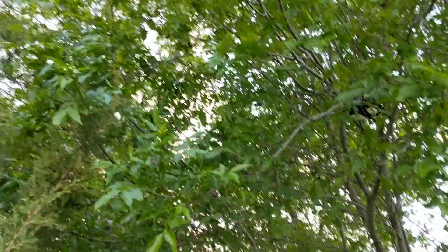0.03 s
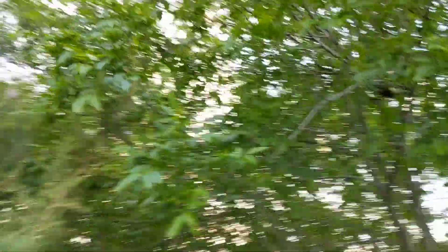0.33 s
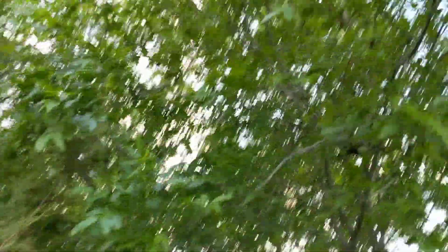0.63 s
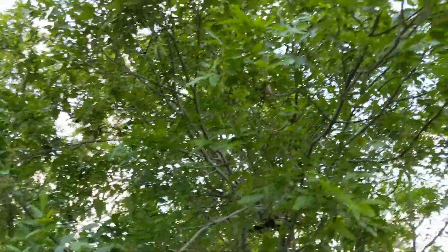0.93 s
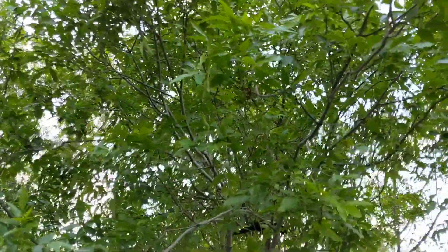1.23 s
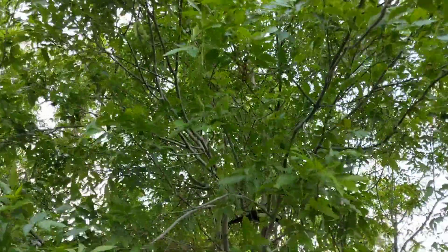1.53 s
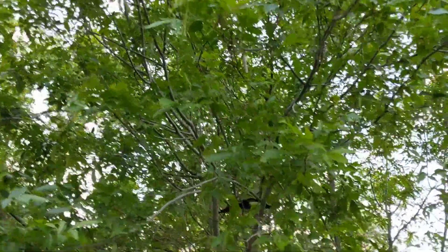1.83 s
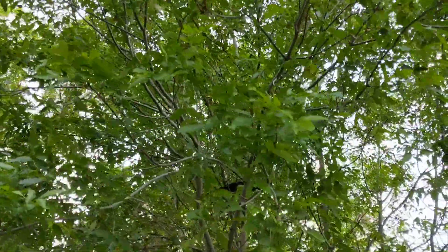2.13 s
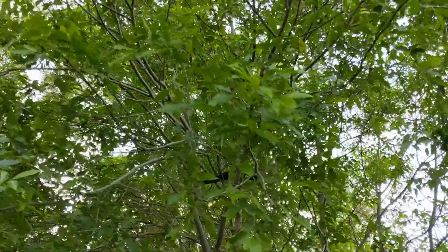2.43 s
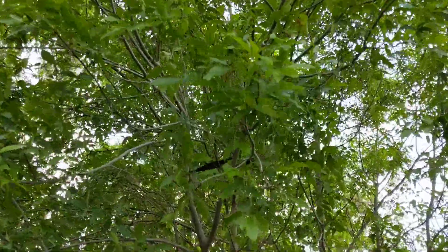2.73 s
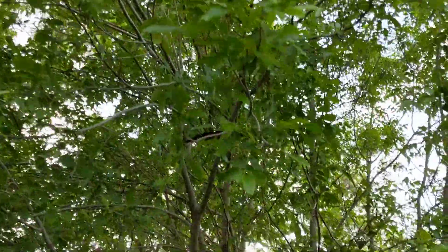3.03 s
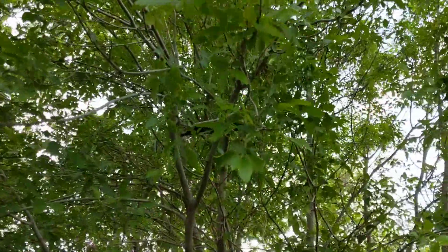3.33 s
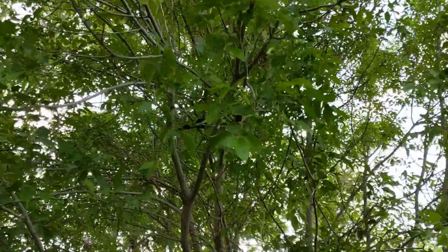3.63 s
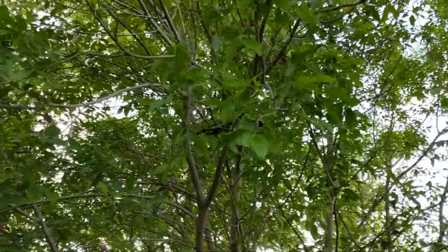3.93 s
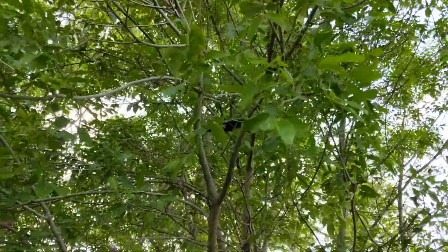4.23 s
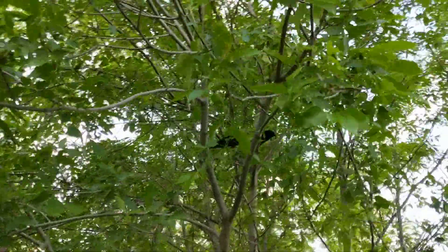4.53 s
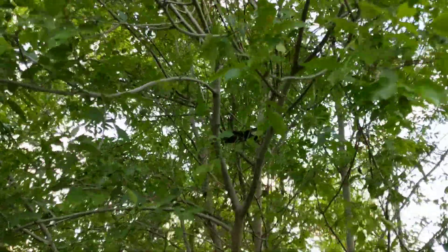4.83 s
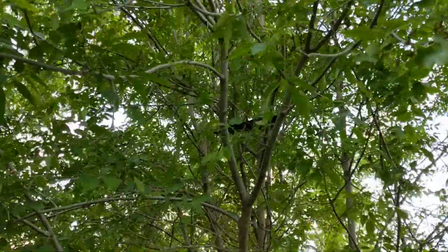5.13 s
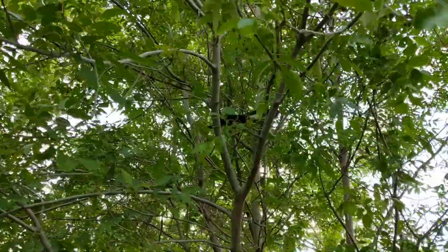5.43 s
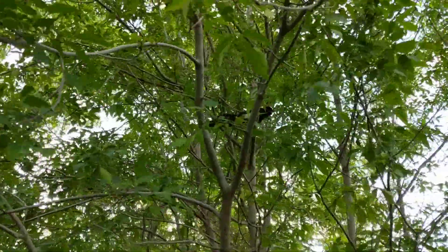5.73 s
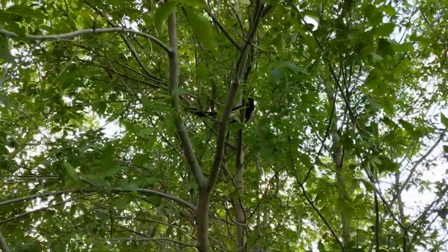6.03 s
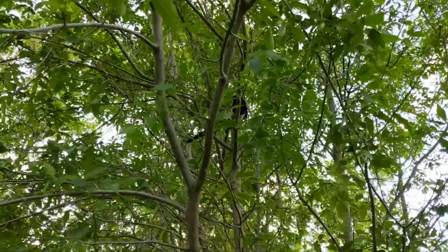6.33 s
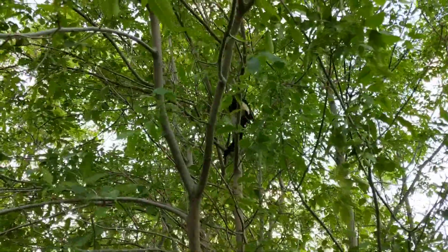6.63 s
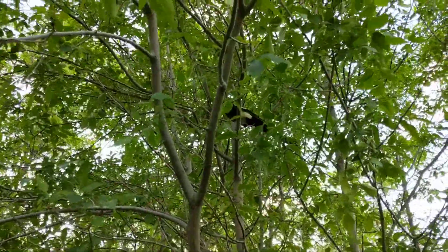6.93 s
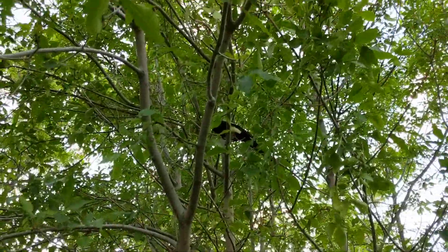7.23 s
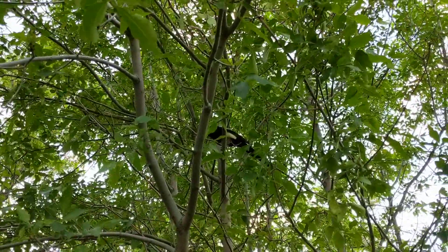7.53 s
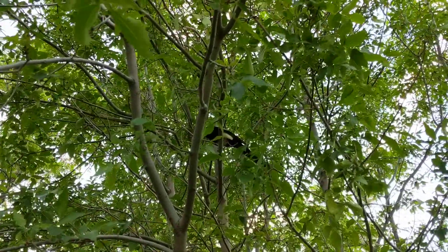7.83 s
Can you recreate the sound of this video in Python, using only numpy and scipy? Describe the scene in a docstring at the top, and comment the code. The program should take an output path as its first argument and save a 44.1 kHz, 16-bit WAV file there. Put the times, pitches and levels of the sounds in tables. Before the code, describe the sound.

Rapid, raspy magpie chatter outdoors pauses for twig snaps, leaf rustle and a distant small bird, then starts again.

```python
"""A magpie in a leafy tree rattles two runs of harsh syllables, five a second. Its membranes slap
unevenly while slack, then tighten and lock into a tone: each rasp becomes a rising squawk.
In the pause a small bird whistles chirps further off, leaves rustle and twigs snap and ring.
Branches and trees scatter the calls and snaps. Gusts and soft bumps sound at the hand-held
microphone, over a distant outdoor wash."""
import sys
import numpy as np
from scipy import signal
from scipy.fft import rfft, irfft, next_fast_len
from scipy.io import wavfile
from scipy.ndimage import uniform_filter1d

SR = 44100
rng = np.random.default_rng(int(sys.argv[2]) if len(sys.argv) > 2 else 0)


def bounce(signal):
    """Save signal as a 16-bit WAV file at the path given by the first command-line argument."""
    frames = np.transpose(np.atleast_2d(signal))
    limited = np.clip(frames, -1, 1)
    pcm = np.round(limited * 32767).astype(np.int16)
    wavfile.write(sys.argv[1], SR, pcm)


N = 356769
TIME_S = np.arange(N) / SR
BAND_LIMIT_HZ = 15900

# distant wash spectrum: freq_hz, gain_db
WASH_SPECTRUM = [(15, -39), (25, -36), (55, -6.5), (166, -14.5), (212, -11.5), (335, -18), (405, -20),
                 (677, -19), (988, -17.5), (2160, -28), (2610, -32), (5140, -40.5), (8360, -38),
                 (10700, -43.5), (16000, -47)]
# wind buffet spectrum: freq_hz, gain_db
GUST_SPECTRUM = [(22, -31.5), (45, 1), (75, 4), (115, -1.5), (170, -14), (300, -27.5), (700, -30.5),
                 (2000, -60.5)]
# gusts on the microphone: peak_s, level_db, rise_s, fall_s
GUSTS = [(2.6, -52.5, 0.17, .25), (3.06, -47.5, 0.067, 0.28), (3.4, -52.5, 0.094, 0.14),
         (3.64, -48.5, 0.097, 0.082), (3.94, -48.5, 0.024, 0.19), (4.45, -47.5, .03, 0.82),
         (5.02, -41.5, 0.25, 0.31)]
# soft bumps near the microphone, and the dull body of the twig knock at 4.85 s: centre_s, length_s, centre_hz,
# width_hz, level_db
BUMPS = [(.76, 0.12, 161, 7.4, -51), (1.311, 0.004, 350, 650, -41), (2.152, 0.11, 432, 79, -64),
         (3.071, 0.045, 169, 160, -53.5), (4.849, 0.00522, 890, 1700, -41.5), (4.881, 0.088, 57, 26, -45),
         (5.013, 0.081, 79.5, 13, -40.5)]
# rustle spectrum, with a bright microphone resonance near 8.3 kHz: freq_hz, gain_db
RUSTLE_SPECTRUM = [(1000, -39), (2500, -17), (5000, -10.5), (7000, -7.5), (8300, 1.5), (9300, -11),
                   (11000, -21.5), (16000, -27)]
# branches stirring their leaves: peak_s, level_db, rise_s, fall_s
RUSTLES = [(3.9, -65, .4, .5), (4.65, -66, .3, .2), (5.04, -58.5, 0.077, 0.37), (5.41, -56, 0.018, 0.067),
           (5.71, -58.5, 0.085, .06), (6.13, -61.5, 0.066, 0.092), (6.42, -63.5, 0.36, .13),
           (6.945, -42, 0.026, 0.028), (7.04, -54.5, 0.074, 0.13), (7.247, -40, 0.0028, 0.0096)]
# twig resonances: freq_hz, gain_db, t60_s
TWIG_MODES = [(1380, -7, 0.0026), (1900, 5.5, 0.00071), (4070, -9, 0.016), (6340, -6, 0.0014),
              (7920, 14.5, 0.0036)]
# twigs and dry leaves snapping: start_s, peak_db, knock_db
SNAPS = [(0.3715, -31, 22), (4.846, -22, 7), (4.951, -35, 33), (5.024, -35, 13), (5.346, -38, -20),
         (5.423, -33.5, -20), (5.515, -41.5, -14), (5.706, -32.5, -11), (6.564, -38.5, -12),
         (6.994, -38, -20), (7.012, -36, -20), (7.027, -25.5, -27), (7.034, -28.5, -22), (7.061, -39, -20),
         (7.1, -31, -21), (7.113, -35, -16), (7.173, -39, -16)]
# tail scattered by the trees: freq_hz, gain_db, t60_s
GROVE_TAIL = [(498.8, -4, 0.32), (2040, 5, 0.06), (2800, -12, 0.43), (3854, -9.5, 0.37), (4700, 7.5, 0.18),
              (7900, 8, 0.19), (12100, 4, 0.16)]
# small bird's contours, by note: pitch_hz at even steps from start to end
NOTE_CONTOURS = {"slur": (4720, 5750, 5330, 4660, 4600), "hook": (6170, 7070, 6360, 4400),
                 "rise": (3500, 4510, 5080, 4730), "fall": (8150, 7350, 5600, 3950)}
# small bird's song: start_s, length_s, level_db, note
CHIRPS = [(4.947, .062, -60.5, "slur"), (5.11, 0.055, -61, "hook"), (5.144, .095, -57.5, "slur"),
          (5.298, 0.049, -58.5, "hook"), (5.345, 0.083, -55.5, "slur"), (5.49, .047, -57.5, "hook"),
          (5.556, 0.086, -56, "slur"), (5.706, .1, -57.5, "rise"), (5.811, 0.087, -59.5, "fall"),
          (5.954, 0.13, -59.5, "rise"), (6.077, .075, -59, "fall")]
# tone colour of the magpie's call, with a faint high sizzle: freq_hz, gain_db
CALL_COLOUR = [(300, -33.5), (600, -15), (1200, -15.5), (1800, -4), (2400, -7.5), (3050, -0.5),
               (3700, -10.5), (4600, -4), (5150, -2), (6100, -6.5), (8200, -3.5), (9200, -14.5),
               (11200, -21), (12600, -50), (14000, -35), (15500, -55)]
# peaks and dips that rise as the beak opens with pitch: base_hz, pitch_multiple, width_hz, gain_db
BEAK_BANDS = [(0, 1.7, 980, -6), (0, 4.95, 110, -21), (0, 6.05, 1420, 7.5), (0, 9.4, 350, 1),
              (6740, 2.4, 390, 5.5)]
# clear partials in a syllable: harmonic, gain_db
SQUEAL_PARTIALS = [(1, -8), (3, -3), (4, 4.2), (6, 1.8)]
# magpie's syllables, timed at the pitch top: top_s, top_hz, relative_db, rasp_db, bright_db
SYLLABLES = [(0.592, 619.5, -34, 2, 2), (0.778, 758, -32.5, 7.5, 0), (0.968, 777, -31.5, 5.5, 0),
             (1.165, 790.5, -31.5, 6, -1), (1.364, 790.4, -32, 5.5, .5), (1.563, 776, -31.5, 4.5, 0),
             (1.762, 766, -32, 2.5, -.5), (1.971, 777, -32.5, 6.5, -0.5), (2.173, 785.5, -33, 4, 0),
             (2.377, 775, -32, 6, 0), (2.589, 767, -30.5, 5, 1), (2.787, 761, -30.5, 2.5, 1.5),
             (3, 776, -30.5, 5.5, 1.5), (3.208, 784, -29.5, 3, 2), (3.408, 777, -29, 5.5, 3.5),
             (3.613, 773, -29, 5, 4), (3.828, 778.6, -31, 2.5, 1.5), (7.341, 690, -28.5, 3, 6),
             (7.507, 767, -26, 5.5, 6.5), (7.682, 785, -26.5, 2.5, 5.5), (7.863, 796, -27, 5, 6),
             (8.054, 762.5, -27, 3.5, 4.5)]


def amp(db):
    """Decibels to gain."""
    return 10 ** (np.asarray(db) / 20)


def unit(x):
    """Scale to rms 1."""
    return x / np.sqrt(np.mean(x ** 2) + 1e-20)


def lookup(spectrum, hz, column=1):
    """Interpolate a table column over log frequency."""
    table = np.transpose(spectrum)
    return np.interp(np.log(hz + 1), np.log(table[0] + 1), table[column])


def colour(x, spectrum, size=4096):
    """Minimum-phase filter from freq_hz, gain_db points."""
    log_gain = np.log(amp(lookup(spectrum, abs(np.fft.fftfreq(size, 1 / SR)))))
    taps = np.fft.ifft(np.exp(np.conj(signal.hilbert(log_gain)))).real
    return signal.oaconvolve(x, taps[:size // 2])[:len(x)]


def resonate(x, centre_hz, width_hz):
    """Moving unity-gain resonance: shift to 0 Hz, smooth, shift back."""
    carrier = np.exp(2j * np.pi * np.cumsum(centre_hz) / SR)
    pole = np.exp(-np.pi * width_hz / SR)
    return 2 * (carrier * signal.lfilter([1 - pole], [1, -pole], x / carrier)).real


def wander(n, rate_hz):
    """Smooth noise, rms about 1, rolling off at rate_hz."""
    size = next_fast_len(n + 4096)
    rolloff = np.exp(-(np.fft.rfftfreq(size, 1 / SR) / rate_hz) ** 2)
    return unit(irfft(rfft(rng.standard_normal(size)) * rolloff, size))[:n]


def swells(rows, rest_db):
    """Gain curve: resting level plus surges, summed in power."""
    power = amp(rest_db) ** 2
    for peak_s, level_db, rise_s, fall_s in rows:
        t = TIME_S - peak_s
        surge = np.exp(-np.where(t < 0, (t / rise_s) ** 2, t / fall_s))
        power = power + (amp(level_db) * surge) ** 2
    return np.sqrt(power)


def play(source, rows):
    """Mix one event per row; source returns start_s, sound."""
    mix = np.zeros(N)
    for row in rows:
        start_s, sound = source(*row)
        part = mix[max(round(start_s * SR), 0):][:len(sound)]
        part += sound[:len(part)]
    return mix


def distant_wash(level_db=-59.5):
    """Near-steady outdoor noise from far off."""
    wash = colour(rng.standard_normal(N), WASH_SPECTRUM)
    wash = signal.sosfilt(signal.butter(2, 110, "high", fs=SR, output="sos"), wash)
    wash = colour(wash, [(3000, -0.5), (6000, 1), (8300, -14.0), (11000, -2.5)])
    return amp(level_db) * unit(wash) * amp(0.22 * wander(N, 6))


def wind():
    """Gusts buffet the microphone with a low rumble."""
    rumble = colour(rng.standard_normal(N), GUST_SPECTRUM, size=16384)
    rumble = unit(rumble * amp(0.81 * wander(N, 12)))
    rumble = signal.sosfilt(signal.butter(6, 36, "high", fs=SR, output="sos"), rumble)
    return rumble * swells(GUSTS, rest_db=-57)


def bump(centre_s, length_s, centre_hz, width_hz, level_db):
    """Short, dull swell of band noise."""
    n = int(length_s * SR)
    baseband = wander(n, width_hz) + 1j * wander(n, width_hz)
    band = (baseband * np.exp(2j * np.pi * centre_hz * np.arange(n) / SR)).real
    return centre_s - length_s / 2, amp(level_db) * unit(band * np.hanning(n))


def leaves(ticks_per_s=900, spread_db=4):
    """Stirred leaves: clumps of tiny ticks, a few sharp, over a soft swish."""
    sizes = rng.choice([-1., 1.], N) * amp(spread_db * np.minimum(rng.exponential(1, N), 4))
    ticks = (rng.random(N) < ticks_per_s / SR) * sizes
    stir = (unit(ticks) + rng.standard_normal(N)) * amp(3.1 * wander(N, 23))
    return swells(RUSTLES, rest_db=-75) * unit(colour(stir, RUSTLE_SPECTRUM))


def grove(x, near_db, near_decay_s, far_db, echoes_per_s=2500):
    """Near branches scatter within milliseconds; trees behind add a short tail."""
    t = np.arange(SR // 2) / SR
    near, far = rng.choice([-1., 1.], (2, len(t))) * (rng.random((2, len(t))) < echoes_per_s / SR)
    near = near * np.exp(-t / near_decay_s) * (t > .001)
    hz, frame_s, bands = signal.stft(far, SR, nperseg=256)
    t60_s = lookup(GROVE_TAIL, hz, column=2)[:, None]
    bands = bands * amp(lookup(GROVE_TAIL, hz)[:, None] - 60 * frame_s / t60_s)
    far = signal.istft(bands, SR, nperseg=256)[1][:len(t)] * (t > .006)
    taps = amp(near_db) * near / np.linalg.norm(near) + amp(far_db) * far / np.linalg.norm(far)
    return x + signal.oaconvolve(x, taps)[:N]


def twig_snap(start_s, peak_db, knock_db):
    """A crack rings a twig's modes; thick twigs knock lower."""
    t = np.arange(SR // 40) / SR
    ring = 0
    for hz, gain_db, t60_s in TWIG_MODES:
        decay = amp(gain_db + knock_db * (hz < 3000) - 60 * t / t60_s)
        ring += decay * np.sin(2 * np.pi * hz * rng.uniform(1.0, 1.04) * t)
    crack = 0.95 * rng.standard_normal(len(t)) * np.exp(-t / 0.0013)
    snap = colour(ring + crack, [(8500, 17), (10000, 16), (13000, -21.5)])
    return start_s, amp(peak_db) * snap / abs(snap).max()


def small_bird_chirp(start_s, length_s, level_db, note):
    """Thin, wavering whistle along a smooth pitch contour."""
    n, knots_hz = int(length_s * SR), NOTE_CONTOURS[note]
    contour = np.polyfit(np.linspace(0, 1, len(knots_hz)), knots_hz, len(knots_hz) - 1)
    pitch_hz = np.polyval(contour, np.linspace(0, 1, n)) * (1 + 0.0095 * wander(n, 250))
    envelope = signal.windows.tukey(n, .45) * amp(1.6 * wander(n, 90))
    return start_s, amp(level_db) * envelope * np.sin(2 * np.pi * np.cumsum(pitch_hz) / SR)


def leaf_scatter(x, decay_s=0.003):
    """Leaves around the beak smear the slaps, by new paths each syllable."""
    t = np.arange(SR // 40) / SR
    paths = rfft(rng.standard_normal(len(t)) * np.exp(-t / decay_s), 4096)
    whitened = paths / np.sqrt(uniform_filter1d(abs(paths) ** 2, size=50))
    return unit(signal.oaconvolve(x, irfft(whitened)[:len(t)])[:len(x)])


def membranes(pitch_hz, roughness, jitter=0.0866, shimmer_db=4.5, flap_hz=140, flap_db=2):
    """Uneven slaps and air puffs, bunched into a rattle by slow flapping; returns drive, cycles."""
    n = len(pitch_hz)
    slap_hz = pitch_hz * np.exp(jitter * roughness * wander(n, 531) + 0.00893 * wander(n, 54))
    cycles = np.cumsum(slap_hz) / SR + rng.random()
    slaps = np.sinc((cycles % 1 - .5) / slap_hz * 2 * BAND_LIMIT_HZ) / np.sqrt(slap_hz)
    slaps = leaf_scatter(unit(slaps) * amp(shimmer_db * roughness * wander(n, 1100)))
    puffs = unit(rng.standard_normal(n) * (0.32 + np.exp(-((cycles + .5) % 1) / 0.46)))
    flap = np.sin(2 * np.pi * np.cumsum(flap_hz * (1 + 0.078 * wander(n, 68))) / SR)
    drive = np.sqrt(1 - roughness) * slaps + np.sqrt(roughness) * puffs
    return drive * amp(flap_db * roughness * flap), cycles


def rasp(drive, pitch_hz, treble_db):
    """Beak bands and the call's tone colour shape the drive; harder closure adds treble."""
    for base_hz, pitch_multiple, width_hz, gain_db in BEAK_BANDS:
        drive = drive + (amp(gain_db) - 1) * resonate(drive, base_hz + pitch_multiple * pitch_hz, width_hz)
    low = signal.sosfiltfilt(signal.butter(2, 3800, fs=SR, output="sos"), drive)
    return unit(colour(low + (drive - low) * amp(treble_db), CALL_COLOUR))


def squeal(cycles, roughness, flare_hz=2960):
    """Clear harmonics flare as each sweeps through the throat's peak."""
    n = len(cycles)
    tone = sum(amp(gain_db + 2.05 * wander(n, 360)) * np.sin(2 * np.pi * harmonic * cycles)
               for harmonic, gain_db in SQUEAL_PARTIALS)
    tone = colour((1 - roughness) * tone, CALL_COLOUR)
    return resonate(tone, np.full(n, flare_hz), width_hz=1070)


def magpie_syllable(top_s, top_hz, relative_db, rasp_db, bright_db):
    """Membranes tighten ever faster, lock into a squeal, let go; pitch and treble follow tension."""
    lead_s, attack_s, hold_s = .114, .002, 0.0049
    swell_db, release_db_per_s, trim_db = 22, 840, -6
    tighten_s, slacken_s, slack_hz = .075, .026, 280
    lock_tension, lock_spread = 0.482, .12
    t = np.arange(-lead_s, .04, 1 / SR)
    before_s, after_s = np.maximum(-t, 0), np.maximum(t, 0)
    tension = np.exp(-before_s / tighten_s - (after_s / slacken_s) ** 2)
    pitch_hz = slack_hz + (top_hz - slack_hz) * tension
    locked = 1 / (1 + np.exp((lock_tension - tension) / lock_spread))
    roughness = np.interp(locked, [0, 1], [.88, .27])
    treble_db = np.interp(tension, [0, 1], [-11.5, 1]) + bright_db
    drive, cycles = membranes(pitch_hz, roughness)
    voice = rasp(drive, pitch_hz, treble_db) + 1.74 * squeal(cycles, roughness)
    attack = np.minimum((t + lead_s) / attack_s, 1)
    effort_db = -swell_db * (before_s / lead_s) ** 1.99 - release_db_per_s * np.maximum(t - hold_s, 0)
    opening_db = rasp_db * np.minimum(before_s / 0.095, 1)
    envelope = attack * amp(effort_db + opening_db)
    return top_s - lead_s, amp(relative_db + trim_db) * unit(voice * envelope)


def scene():
    """Both birds among the trees; twigs, leaves and wind close by. Mono."""
    magpie = grove(play(magpie_syllable, SYLLABLES), near_db=-10, near_decay_s=0.017, far_db=-12)
    small_bird = grove(play(small_bird_chirp, CHIRPS), near_db=-18, near_decay_s=0.024, far_db=-4)
    twigs = grove(play(twig_snap, SNAPS), near_db=-13, near_decay_s=0.0043, far_db=-28)
    return (magpie + small_bird + twigs + leaves() + play(bump, BUMPS) + distant_wash() + wind())[None]


def record(dry, open_s=.317, open_db=-7, settle_s=0.44):
    """The microphone opens after a moment and comes up to level; steep low-pass."""
    gain = (TIME_S > open_s) * amp(np.interp(TIME_S, [open_s, open_s + settle_s], [open_db, 0]))
    lowpass = signal.firwin(511, BAND_LIMIT_HZ, window=("kaiser", 9), fs=SR)
    return signal.oaconvolve(dry * gain, lowpass[None], "same")


dry = scene()
out = record(dry)
bounce(out)
```